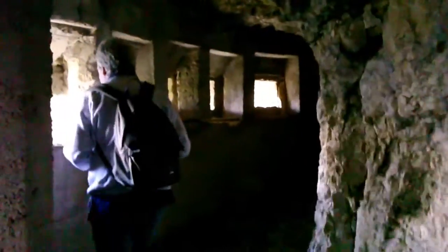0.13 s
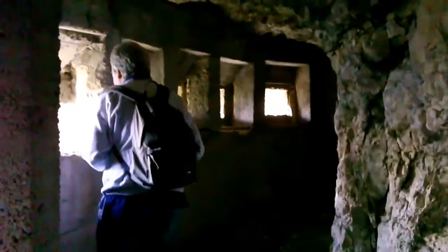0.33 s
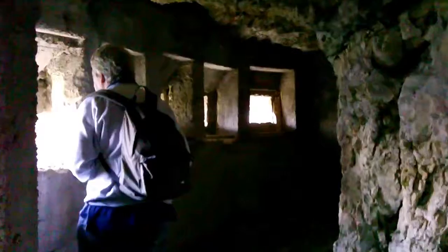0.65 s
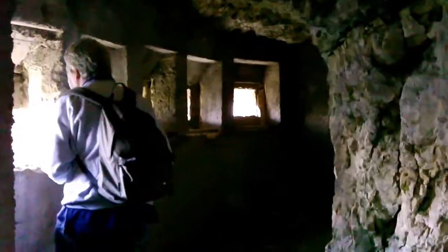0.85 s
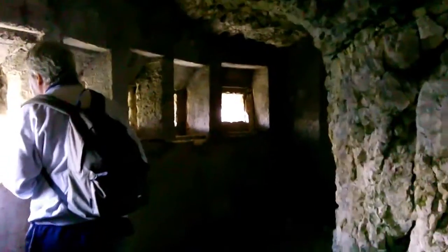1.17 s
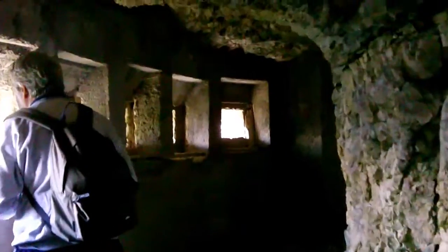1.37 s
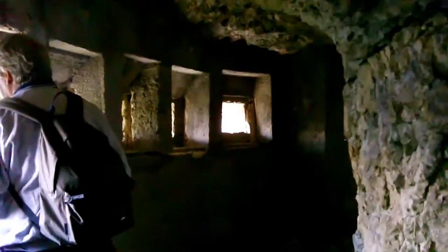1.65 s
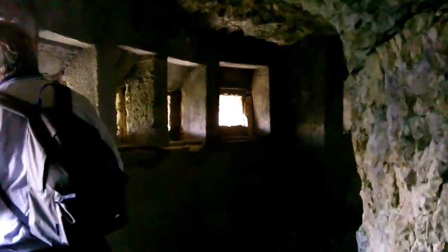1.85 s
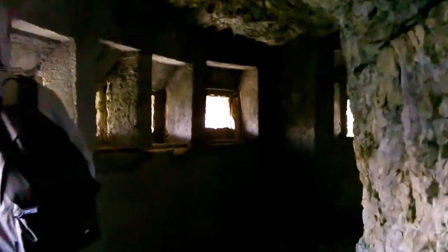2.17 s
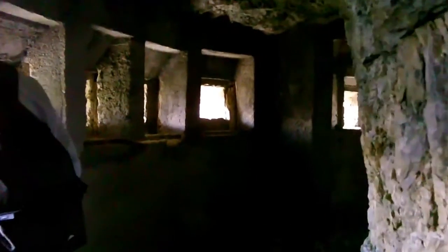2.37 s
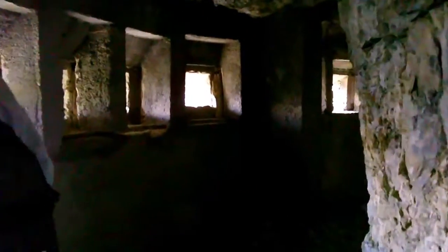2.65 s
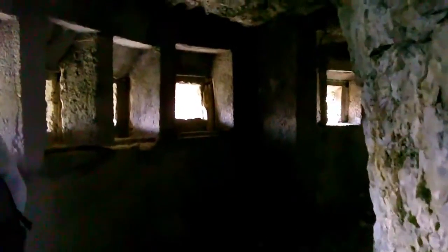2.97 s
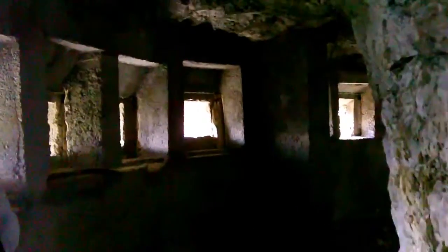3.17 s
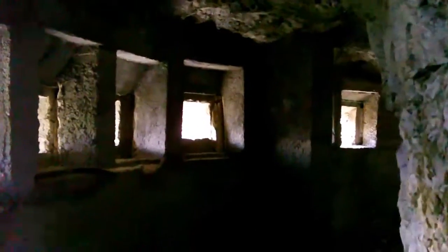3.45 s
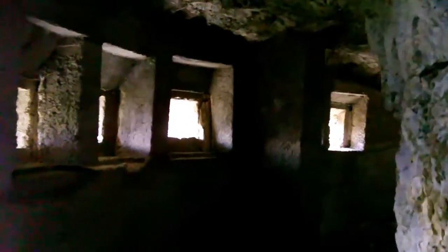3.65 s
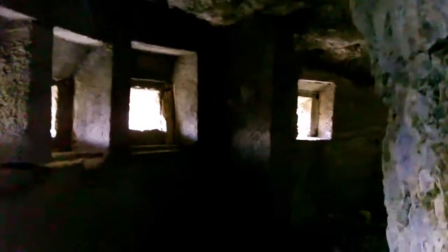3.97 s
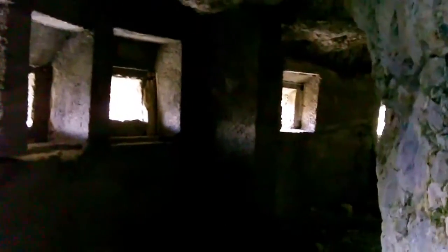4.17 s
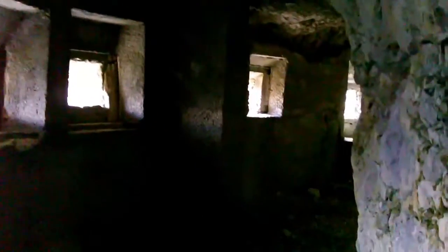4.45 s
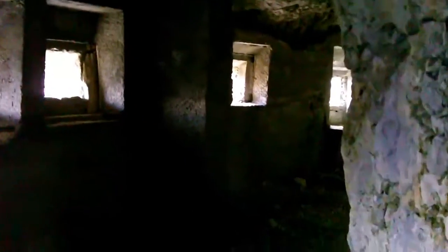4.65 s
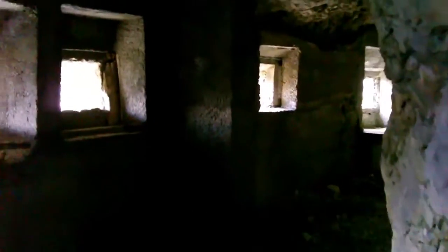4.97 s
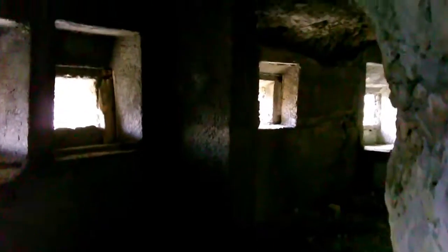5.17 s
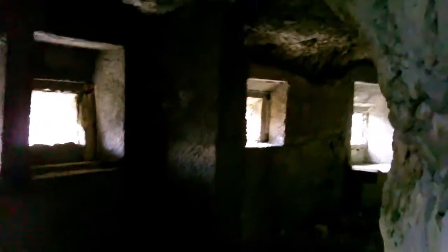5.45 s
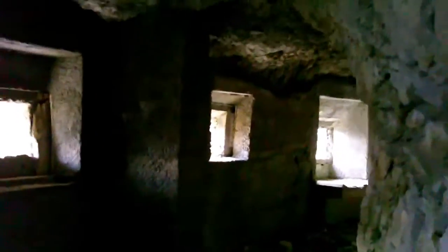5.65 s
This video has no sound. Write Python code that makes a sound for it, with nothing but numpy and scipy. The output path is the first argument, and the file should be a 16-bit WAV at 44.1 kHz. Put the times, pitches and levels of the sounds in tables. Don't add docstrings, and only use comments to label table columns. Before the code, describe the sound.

A handheld microphone follows its holder walking over loose stones in a small rock chamber. Crunching, scraping steps with clacking, rolling stones crowd the first two and a half seconds; then sharper, separated boot thuds fall near 3.1, 3.8, 4.75, 5.3 and 5.6 seconds. Hard walls give a short echo. Low draught rumble, soft handling bumps and hiss lie underneath. The steps sound only on the left; the right holds faint hiss.

```python
import sys
import numpy as np
from scipy import signal
from scipy.fft import rfft, irfft, next_fast_len
from scipy.io import wavfile
from scipy.ndimage import map_coordinates

SR = 44100
rng = np.random.default_rng(int(sys.argv[2]) if len(sys.argv) > 2 else 0)


def gain_from_db(level_db):
    decades = np.asarray(level_db, float) / 20
    return 10 ** decades


def bounce(signal):
    frames = np.transpose(np.atleast_2d(signal))
    limited = np.clip(frames, -1, 1)
    pcm = np.round(limited * 32767).astype(np.int16)
    wavfile.write(sys.argv[1], SR, pcm)


N = 256662

# peak_s, weight_db, stones_db, rise_s, fall_s (times span 20
# dB)
PRESSES = [(0.0, -40.5, -46.5, .05, 0.45), (0.14, -37.5, -57, 0.031, 0.21), (0.26, -53, -47.5, 0.12, 0.22),
           (0.53, -28.5, -39.5, 0.05, 0.16), (0.66, -40.5, -44.5, 0.029, 0.21), (1.04, -49, -52, 0.26, 1),
           (1.25, -41.5, -53, 0.056, 0.16), (1.409, -31, -38, 0.11, 0.18), (1.591, -32, -44, 0.11, 0.15),
           (1.8, -41, -52.5, 0.071, 0.12), (2.03, -38, -61, 0.066, 0.39), (2.22, -37, -46, 0.54, 0.3),
           (2.69, -62, -47, 0.028, 0.095), (2.92, -44, -49.5, 0.068, 0.076),
           (3.085, -31.5, -40.5, 0.016, 0.049), (3.22, -41, -49.5, 0.51, 0.2),
           (3.52, -48, -47.5, 0.016, 0.081), (3.779, -44, -57, .02, 0.37), (4.02, -45, -42.5, 0.13, 0.15),
           (4.759, -34.5, -63, 0.019, 0.045), (4.92, -44.5, -51, 0.076, 0.18),
           (5.268, -39.5, -53, 0.04, 0.13), (5.622, -34, -54, 0.0087, 0.099), (5.78, -63, -63, 0.24, 0.3),
           (1.362, -29.5, -51, 0.026, 0.19),
    (1.5, -46, -47.5, 0.14, .15),
    (4.35, -55, -65.5, 0.77, 0.56),
    (5.45, -58, -54.5, 0.16, 0.15),
]
# peak_s, level_db, fall_s
SCUFFS = [(0.135, -46, 0.075), (0.531, -50, 0.11), (1.037, -54, 0.066), (1.248, -54, 0.065),
          (1.388, -48.5, 0.14), (1.566, -45, 0.079), (1.592, -45.5, 0.051), (1.81, -64, 0.067),
          (2.2, -57.5, 0.14), (3.1, -67, 0.045), (3.521, -58, 0.04), (3.78, -61, 0.084), (4.02, -61, 0.09),
          (4.9, -66, .09), (5.71, -62.5, 0.1)]
# start_s, peak_db, ground_hz, t60_s, slab_hz
SOLE_BLOWS = [(0.127, -34.5, 94.7, 0.21, 502.6), (0.132, -36.5, 192, 0.12, 493),
              (1.46, -35, 169.6, 0.26, 374), (4.77, -40, 185, .15, 300), (0.503, -33, 172, 0.038, 290),
              (0.528, -34.5, 175, 0.13, 495), (1.023, -32, 112, 0.059, 350),
              (1.352, -45.5, 146.4, 0.71, 432), (1.41, -24, 176, 0.11, 463), (1.576, -26, 141.6, 0.13, 366),
              (2.019, -32, 199, 0.11, 367), (2.149, -34.5, 250, 0.1, 340), (2.964, -25.5, 240, 0.018, 458),
              (3.046, -18, 227.6, 0.049, 255), (3.083, -28.5, 150, 0.066, 497),
              (3.509, -24, 108, 0.028, 460), (3.767, -20, 139, 0.033, 367), (4.746, -23.5, 116, 0.073, 287),
              (5.2599, -19.5, 147, 0.034, 403), (5.616, -29.5, 187, 0.098, 301),
              (0.54, -32, 150, 0.096, 280), (0.663, -29.5, 92, 0.1, 436), (0.98, -37, 105, 0.067, 326),
             (1.096, -39, 152, 0.087, 406), (1.384, -31.5, 263, 0.1, 320), (1.726, -45, 128, .11, 428),
             (1.787, -61, 202, 0.078, 390), (1.956, -57, 103, 0.093, 435), (2.189, -37.5, 212.6, 0.24, 416),
             (2.208, -42.5, 218, 0.19, 296), (2.263, -42, 215, 0.044, 302), (2.324, -46, 148, 0.079, 500),
             (2.877, -44.5, 190, 0.098, 464), (2.987, -43, 214, 0.12, 390), (3.0923, -21, 191, 0.04, 560),
             (3.189, -34, 226, 0.092, 295), (3.824, -27.5, 103, 0.044, 546),
             (3.983, -39.5, 162.4, 0.094, 544), (4.016, -40, 255, 0.066, 490),
             (4.7575, -21, 85, 0.035, 375), (4.887, -44, 172, 0.069, 302), (5.2756, -24, 151, 0.029, 474),
             (5.631, -22, 150, 0.08, 350), (5.702, -29, 150, 0.051, 308)]
# start_s, peak_db, pitch_hz
EDGE_SLAPS = [(3.0813, -20.5, 420), (3.7765, -23, 483), (4.7501, -14, 320), (5.616, -26, 297),
              (0.333, -36, 1350), (1.3, -36, 800), (1.355, -29, 600), (2.907, -35, 700), (2.966, -27, 520),
              (3.192, -35, 750), (3.801, -31, 620), (2.201, -28, 900), (1.4175, -19, 230)]
# start_s, peak_db, pitch_hz
KNOCKS = [(0.127, -47, 890), (0.256, -41, 1104), (0.332, -39, 1406), (0.528, -29, 667), (0.662, -43, 790),
          (1.244, -39.5, 830), (1.299, -41.5, 677), (1.354, -38, 857), (1.56, -36.5, 660),
          (2.017, -44, 1256), (2.089, -39.5, 1006), (2.154, -40, 830), (2.202, -32.5, 663),
          (2.68, -50, 645), (2.882, -38, 630), (2.906, -39, 680), (2.968, -39, 820), (3.08, -35, 595),
          (3.192, -54, 790), (3.227, -42, 1023), (3.51, -64, 630), (3.774, -36.5, 830), (3.801, -45, 645),
          (4.013, -35, 800), (4.7504, -45, 815), (4.902, -51, 1300), (5.616, -46.5, 705), (3.986, -47, 904)]
# start_s, peak_db, pitch_hz
CLACKS = [(0.256, -37.5, 934), (0.333, -45, 1390), (0.663, -44, 400), (1.25, -41, 437), (1.352, -37, 465),
          (1.37, -45, 406), (1.96, -39, 500), (1.96, -40.5, 837), (2.19, -29.5, 450), (2.2, -35.5, 912),
          (2.265, -34, 537), (2.327, -31, 490), (2.33, -43.5, 960), (2.964, -27.5, 466), (2.881, -36, 467),
          (3.078, -32.5, 515), (3.512, -48.5, 1270), (3.8, -36.5, 590), (3.825, -51, 620),
          (4.013, -36, 570), (4.015, -48, 860), (4.7535, -32, 345), (4.888, -41.5, 986),
          (4.96, -50.5, 1390), (5.259, -61, 446), (5.639, -44.5, 857), (5.7, -50, 543)]
# start_s, peak_db, pitch_hz
PEBBLE_CRACKS = [(0.1221, -44, 2380), (0.208, -47, 2670), (0.2537, -41.5, 2000), (0.3326, -58, 3260),
                 (0.4586, -54, 2880), (0.5217, -39, 3090), (0.9814, -46.5, 2370), (1.037, -50, 2500),
                 (1.2437, -46.5, 2530), (1.3, -51.5, 2380), (1.357, -45, 4670), (1.4593, -44.5, 2200),
                 (1.5607, -36, 7060), (1.5874, -39, 4580), (1.8094, -53, 4940), (2.2006, -54, 2820),
                 (3.0797, -46, 4820), (3.5143, -53, 6600), (3.7745, -44.5, 3130), (3.8, -49, 3480),
                 (3.9345, -45, 2110), (3.986, -51, 3100), (4.0178, -48, 3220), (4.89, -50, 2600),
                 (5.6363, -52, 2700), (5.7094, -61, 3030)]
# start_s, peak_db, pitch_hz
GRIT_SPITS = [(0.1221, -50, 8750), (0.207, -49, 7900), (0.5233, -44.5, 9300), (1.036, -60, 9230),
              (1.2446, -54.5, 9300), (1.354, -54.5, 8700), (1.5468, -46.5, 9550), (3.0874, -50, 8600),
              (3.8194, -60, 8470), (5.7094, -64, 9770)]
# start_s, peak_db, pitch_hz
ROLLS = [(0.02, -42, 916), (0.04, -46, 1000), (0.063, -41, 860), (0.083, -41, 880), (0.098, -46, 955),
         (0.135, -47, 890), (0.262, -44, 1320), (0.272, -54, 910), (0.345, -43, 2010), (0.365, -48, 1310),
         (1.298, -43, 910), (1.353, -36, 594), (1.392, -39, 404), (1.415, -39, 980), (1.5, -35, 385),
         (1.56, -38.5, 940), (1.579, -38, 430), (1.59, -32, 655), (2.005, -45, 1300), (2.014, -29, 400),
         (2.03, -41, 470), (2.049, -50, 1240), (2.074, -42, 1277), (2.088, -48, 890), (2.1, -35, 434),
         (2.119, -40.5, 1294), (2.143, -32, 510), (2.155, -39.5, 1297), (2.264, -40, 930), (2.28, -44, 950),
         (2.345, -42, 500), (2.4, -45, 1017), (2.69, -49, 1100), (2.907, -44, 690), (3.192, -46, 690),
         (3.82, -45, 583), (3.9, -50, 820), (3.972, -53, 905), (3.99, -42, 620), (4.025, -40, 755),
         (4.035, -43, 990), (4.05, -49, 910), (4.751, -46, 1310), (4.902, -48, 1194), (4.92, -58, 1150),
         (5.619, -53, 600), (0.521, -43, 1200), (0.526, -46, 1500), (0.528, -37, 477), (0.548, -42, 810),
         (0.572, -39, 517), (1.097, -42, 434), (1.15, -39, 367), (1.105, -46, 870), (1.255, -45, 426),
         (3.041, -36, 330), (3.079, -42, 950), (3.095, -49, 960), (5.696, -44, 500)]
# start_s, peak_db, pitch_hz
CHIPS = [(0.137, -50, 2510), (0.14, -52, 3100), (0.205, -54, 2710), (0.265, -52, 3170), (0.345, -53, 3250),
         (1.375, -47, 4900), (1.39, -50, 4700), (1.555, -52, 4800), (1.575, -48, 2630), (1.59, -47.5, 4600),
         (3.775, -46, 3400), (3.776, -45, 2780), (3.802, -54, 3500), (3.9, -53, 3200), (3.986, -53, 3200),
         (4.018, -55, 2900), (4.028, -53, 3300), (4.888, -56, 3300), (4.905, -56, 2600)]
# centre_hz, width_hz, level_db
GALLERY_MODES = [(94.7, 20, -5), (168, 40, -3.5), (262.5, 71, -2), (375, 134, 2.5), (546, 270, 0)]
# freq_hz, t60_s
WALL_DECAY = [(80, 0.89), (300, 0.39), (1500, 0.73), (8000, 0.12)]
# freq_hz, level_db
STONES_COLOUR = [(350, 1.5), (600, -0.5), (900, 0), (1400, -0.5), (1900, 0), (2600, 0.5)]
# freq_hz, level_db
GRIT_COLOUR = [(1200, 2.5), (2300, -2), (3500, -4.5), (4800, 0.5), (7000, 2.5), (10000, 4), (13000, -4),
               (16000, -4)]
# time_s, rumble_db
DRAUGHT = [(0.0, -51.5), (0.32, -48.5), (0.6, -50), (0.79, -56.5), (1.28, -49), (1.54, -47), (1.9, -53.5),
           (2.2, -44.5), (2.46, -57.5), (3.1, -61), (3.45, -59), (3.79, -59.5), (3.97, -55), (4.6, -65.5),
           (5.1, -51.5), (5.54, -72), (5.66, -47), (5.82, -53)]
# freq_hz, level_db
RUMBLE_COLOUR = [(12, -22), (25, 16), (60, 5.5), (95, 14), (160, -35.5)]
# start_s, peak_db, pitch_hz
HOUSING_BUMPS = [(0.389, -62, 32.6), (0.448, -36, 33), (0.522, -32, 81.5), (0.6, -42, 80.7),
                 (0.659, -39, 32), (1.032, -37.5, 99.5), (1.2093, -23.5, 56), (1.682, -30, 48.6),
                 (1.791, -40, 69), (1.859, -28.5, 52), (2.237, -34, 45), (2.359, -34, 39.8),
                 (2.435, -31.5, 38.6), (3.318, -45, 32.3), (3.748, -45, 40.4), (3.828, -35.5, 94),
                 (3.901, -36.5, 32), (3.959, -44, 32.3), (4.069, -38.5, 33.4), (4.749, -51, 78.4),
                 (4.819, -41, 53.8), (5.008, -39, 89), (5.258, -40, 93)]
# freq_hz, level_db
HISS_COLOUR = [(12, -23), (30, 2.5), (60, 0), (150, 0), (500, -8.5), (1500, -15.5), (2700, -20),
               (4600, -25.5), (7000, -28.5), (10000, -27.5), (16000, -30.5)]
# centre_hz, width_hz, depth_db
NOTCHES = [(1980, 420, -9), (3953, 500, -11), (5800, 460, -10.5), (7920, 470, -11.5)]
WHISTLE_HZ = [5867, 7762, 7822, 7882, 9778, 9838]
# left_db, right_db
WHISTLE_DB = [(-86, -110), (-92, -99), (-83, -88), (-88, -89), (-86, -110), (-79, -110)]

SETTLE_DB, SETTLE_SLOWER = -31, 1.3
REST_WEIGHT_DB, REST_STONES_DB, REST_GRIT_DB = -59.5, -75, -73
SCUFF_RISE_PER_FALL = 0.35
SLAB_DB, SLAB_FOLLOWS = -38.5, 0.57
BLOW_DELAY_S = 0.00304
EDGE_CYCLES, EDGE_GIVE_S = 0.58, 0.0003
WHISTLE_JITTER_RAD = 0.55
TOP_HZ = 15200


def tread():
    peak_s, weight_db, stones_db, rise_s, fall_s = np.transpose(PRESSES)
    drag_s, grit_db, drag_fall_s = np.transpose(SCUFFS)
    rubble = grains(count=3600, size=900, hz=240, spread=0.52, cycles=1.17, uneven_db=0.44)
    rubble = unit(filtered(rubble, gallery))
    stones = grains(count=7000, size=300, hz=938, spread=0.36, cycles=0.9, uneven_db=0.4)
    stones = coloured(stones, STONES_COLOUR)
    grit = grains(count=30000, size=40, hz=5500, spread=0.72, cycles=0.71, uneven_db=-0.2)
    grit = coloured(grit, GRIT_COLOUR)
    press = swells(peak_s, weight_db, rise_s, fall_s, REST_WEIGHT_DB)
    shift = swells(peak_s, stones_db, rise_s, fall_s, REST_STONES_DB)
    drag = swells(drag_s, grit_db, SCUFF_RISE_PER_FALL * drag_fall_s, drag_fall_s, REST_GRIT_DB)
    return gain_from_db(2.5) * press * rubble + gain_from_db(2.0) * shift * stones + gain_from_db(7.5) * drag * grit


def blows():
    out, t = np.zeros(N + SR), np.arange(SR // 3) / SR
    for s, db, ground_hz, t60_s, slab_hz in SOLE_BLOWS:
        fade = gain_from_db(-60 * t / t60_s)
        weight = 1 - np.exp(-t * ground_hz / 0.6)
        ground = weight * np.sin(2 * np.pi * ground_hz * t)
        slab_db = SLAB_DB - db + SLAB_FOLLOWS * (db + 31.5)
        pair = np.sin(2 * np.pi * slab_hz * t) + 0.26 * np.sin(2 * np.pi * 1.4 * slab_hz * t)
        slab = gain_from_db(slab_db + 4.0) * fade ** 1.01 * (1 - np.exp(-t * slab_hz / 0.62)) * pair
        add(out, s + BLOW_DELAY_S, gain_from_db(db + 8.0) * fade * (ground + slab))
    return out[:N]


def edge_slaps():
    out, t = np.zeros(N + SR), np.arange(SR // 20) / SR
    for s, db, hz in EDGE_SLAPS:
        push = np.sin(2 * np.pi * hz * t) * np.exp(-t * hz / EDGE_CYCLES)
        add(out, s, gain_from_db(db + 3.5) * push * (1 - np.exp(-t / EDGE_GIVE_S)))
    return out[:N]


def struck_stones():
    knocks = snaps(KNOCKS, t60_s=0.042, ring=1.26, q=1.09, rise_s=0.0031, gain_db=5.0)
    clacks = snaps(CLACKS, t60_s=0.032, ring=4.17, q=1.3, rise_s=0.0011, gain_db=-2.0)
    pebbles = snaps(PEBBLE_CRACKS, t60_s=0.03, ring=0.75, q=1.0, rise_s=0.0012, gain_db=3.5)
    spits = snaps(GRIT_SPITS, t60_s=0.064, ring=0, q=2.8, rise_s=0.0016, gain_db=4.5)
    return knocks + clacks + pebbles + spits


def gravel():
    rolls = snaps(ROLLS, t60_s=0.053, ring=1.8, q=2.8, rise_s=0.0015, gain_db=-1.5)
    chips = snaps(CHIPS, t60_s=0.05, ring=0.8, q=5.2, rise_s=0.001, gain_db=-1.0)
    return rolls + chips


def snaps(events, t60_s, ring, q, rise_s, gain_db):
    out, t = np.zeros(N + SR), np.arange(SR // 8) / SR
    for s, db, hz in events:
        resonance = np.hstack(signal.iirpeak(hz, q, SR))
        noise = unit(signal.sosfilt([resonance] * 2, rng.standard_normal(len(t))))
        burst = noise + ring * np.sin(2 * np.pi * hz * t)
        add(out, s, gain_from_db(db + gain_db - 60 * t / t60_s) * (1 - np.exp(-t / rise_s)) * burst)
    return out[:N]


def grains(count, size, hz, spread, cycles, uneven_db):
    at = rng.integers(0, N, count)
    pitch, loud = rng.standard_normal((2, count, 1))
    grain_hz = np.minimum(hz * np.exp(spread * pitch), SR / 3)
    t = np.arange(size) / SR
    waves = np.sin(2 * np.pi * grain_hz * t) * np.exp(-t * grain_hz / cycles)
    waves = gain_from_db(uneven_db * loud ** 2) * waves
    slots = at[:, None] + np.arange(size)
    return unit(np.bincount(slots.ravel(), waves.ravel(), N + size)[:N])


def swells(peaks_s, peaks_db, rises_s, falls_s, rest_db):
    t = np.arange(0, N / SR + 0.002, 0.001)
    power = gain_from_db(2 * rest_db)
    for s, db, rise_s, fall_s in zip(peaks_s, peaks_db, rises_s, falls_s):
        before = np.maximum(s - t, 0) / rise_s
        after = np.maximum(t - s, 0) / fall_s
        fall = gain_from_db(-40 * after) + gain_from_db(2 * SETTLE_DB - 40 * after / SETTLE_SLOWER)
        power = power + gain_from_db(2 * db - 40 * before) * fall
    return np.interp(np.arange(N) / SR, t, np.sqrt(power))


def gallery(hz):
    total = 0
    for k, (centre, width, db) in enumerate(GALLERY_MODES):
        damping = 1j * hz * width
        total = total + (-1) ** k * gain_from_db(db) * damping / (centre * centre - hz * hz + damping)
    return total


def walls(x):
    hz, t, z = signal.stft(rng.standard_normal(SR // 2), SR, nperseg=256)
    fade = gain_from_db(-60 * t / along(WALL_DECAY, hz)[:, None])
    tail = signal.istft(z * fade, SR, nperseg=256)[1]
    delayed = np.pad(x, (200, 0))
    return signal.fftconvolve(delayed, tail / np.linalg.norm(tail))[:N]


def rumble():
    time_s, rumble_db = np.transpose(DRAUGHT)
    level_db = np.interp(np.arange(N) / SR, time_s, rumble_db)
    out, t = np.zeros(N + SR), np.arange(SR // 5) / SR
    for s, db, hz in HOUSING_BUMPS:
        swell = (t / 0.0093) * np.exp(-t / 0.007)
        add(out, s + 0.0071, -gain_from_db(db + 16.0) * np.sin(2 * np.pi * hz * t) * swell)
    air = coloured(gain_from_db(0.49 * wobble(19)) * rng.standard_normal(N), RUMBLE_COLOUR)
    return out[:N] + gain_from_db(level_db + 6.0) * air


def hiss():
    noise = np.array([coloured(v, HISS_COLOUR) for v in rng.standard_normal((2, N))])
    return gain_from_db([[-53], [-53.5]]) * noise


def notch_comb(hz):
    depth_db = sum(db / (1 + ((hz - c) / w * 2) ** 2) for c, w, db in NOTCHES)
    return gain_from_db(depth_db) * (hz < TOP_HZ)


def whistles():
    t, out = np.arange(N) / SR, np.zeros((2, N))
    for hz, (left_db, right_db) in zip(WHISTLE_HZ, WHISTLE_DB):
        tone = np.sin(2 * np.pi * hz * t + WHISTLE_JITTER_RAD * wobble(30))
        out += np.sqrt(2) * gain_from_db([[left_db], [right_db]]) * tone
    return out


def unit(x):
    return x / np.sqrt(np.mean(x ** 2) + 1e-20)


def along(points, hz):
    f, v = np.transpose(points)
    return np.interp(np.log(hz + 1), np.log(f + 1), v)


def wobble(rate_hz):
    knots = rng.standard_normal(int(N / SR * 60))
    return map_coordinates(knots, [np.arange(N) * rate_hz / SR])


def filtered(x, response):
    m = next_fast_len(N + SR // 2)
    return irfft(rfft(x, m) * response(np.fft.rfftfreq(m, 1 / SR)), m)[..., :N]


def coloured(x, spectrum):
    return unit(filtered(x, lambda hz: gain_from_db(along(spectrum, hz))))


def add(track, start_s, wave):
    track[round(start_s * SR):][:len(wave)] += wave


def scene():
    bed = tread() + rumble()
    hits = blows() + struck_stones() + edge_slaps()
    loose = gravel()
    echoes = gain_from_db(-8.0) * walls(hits) + gain_from_db(-11.0) * walls(loose)
    return np.array([hits + loose + echoes + bed, np.zeros(N)])


def roll_off(x):
    return signal.sosfilt(signal.butter(12, 15500, fs=SR, output="sos"), x)


def record(dry):
    mix = filtered(dry + hiss(), notch_comb) + whistles()
    return roll_off(mix)


dry = scene()
out = record(dry)
bounce(out)
```